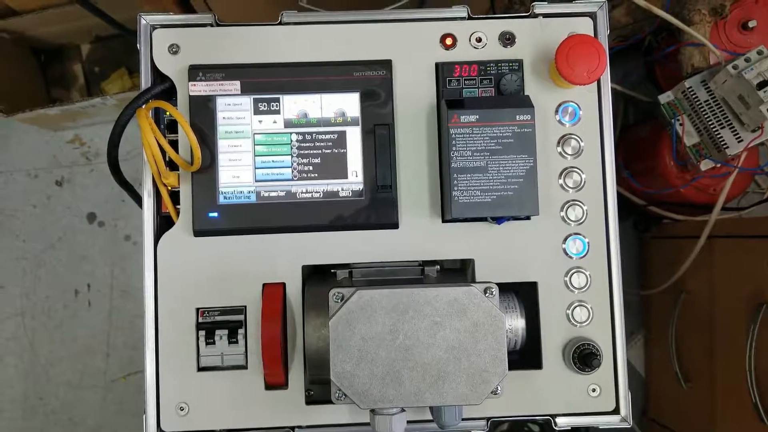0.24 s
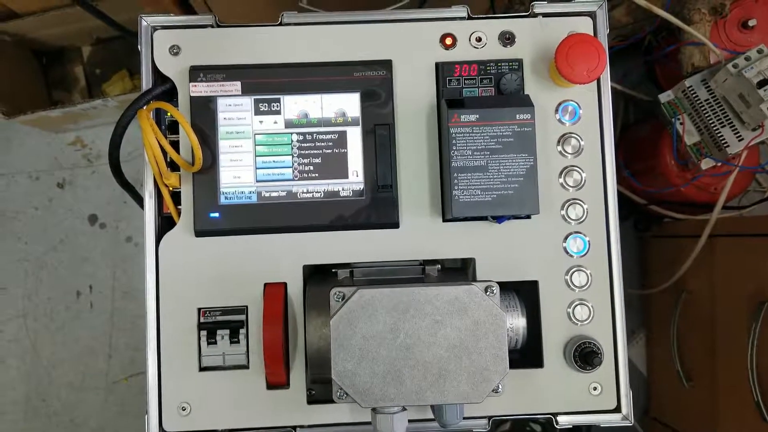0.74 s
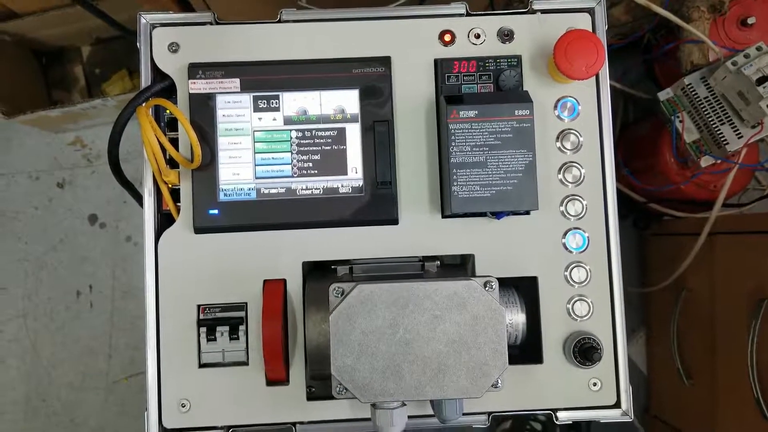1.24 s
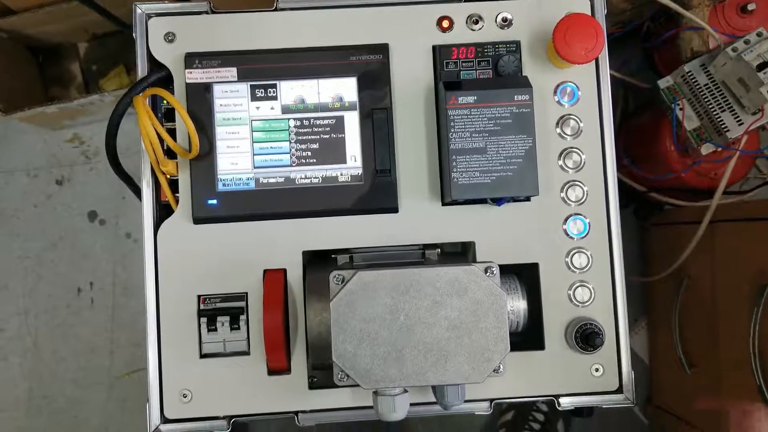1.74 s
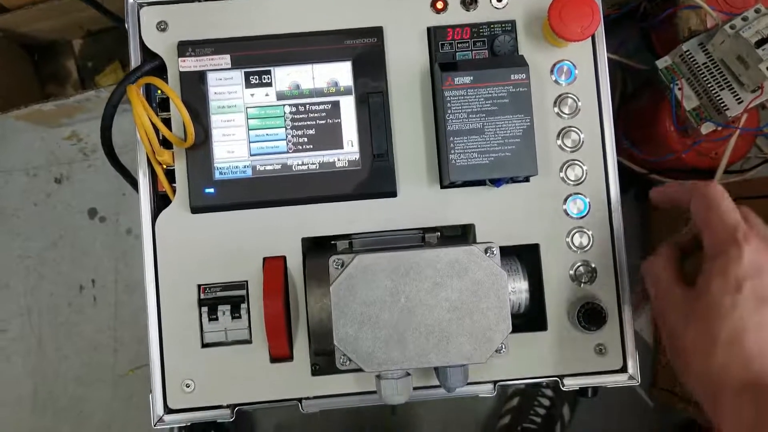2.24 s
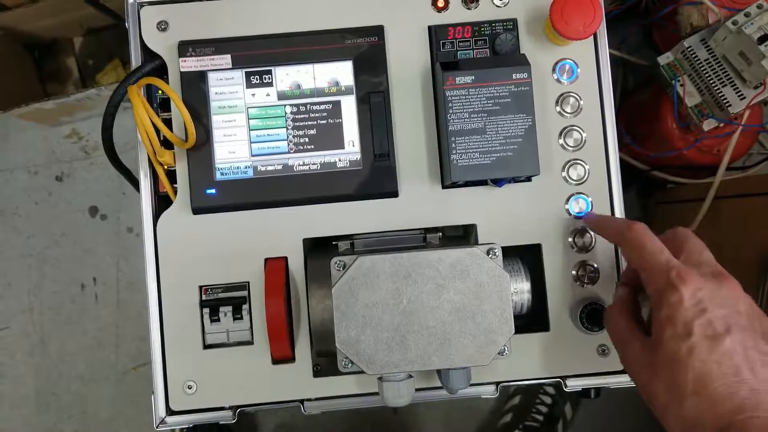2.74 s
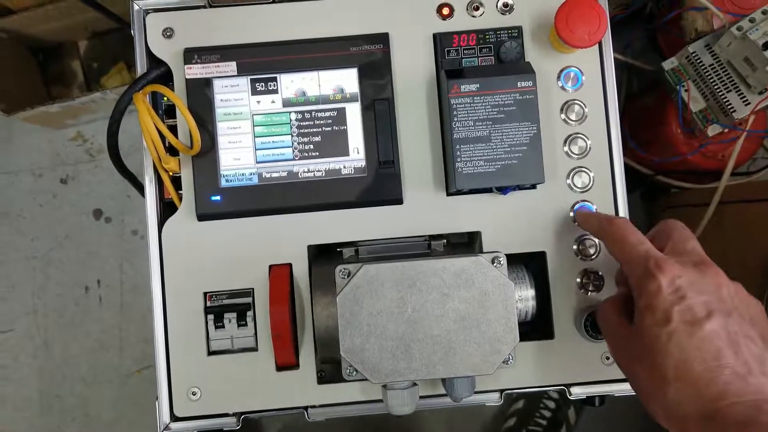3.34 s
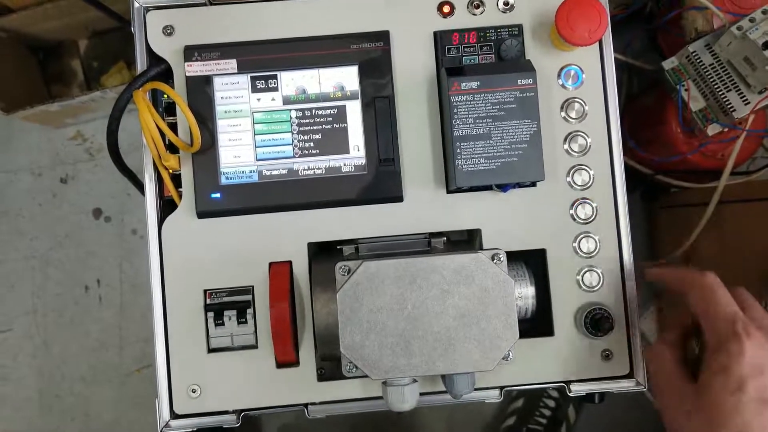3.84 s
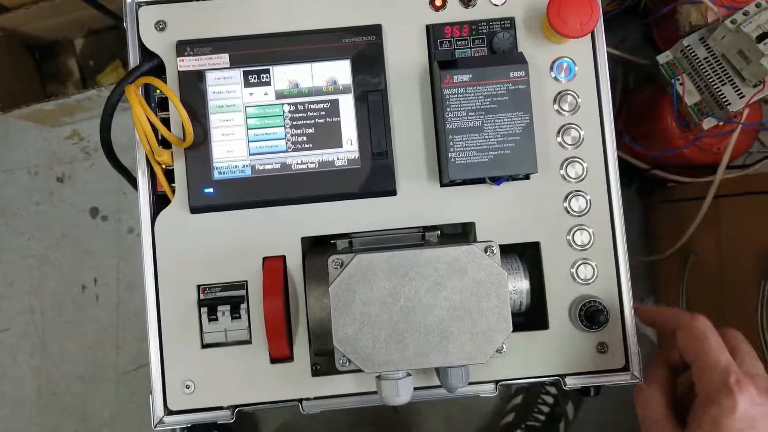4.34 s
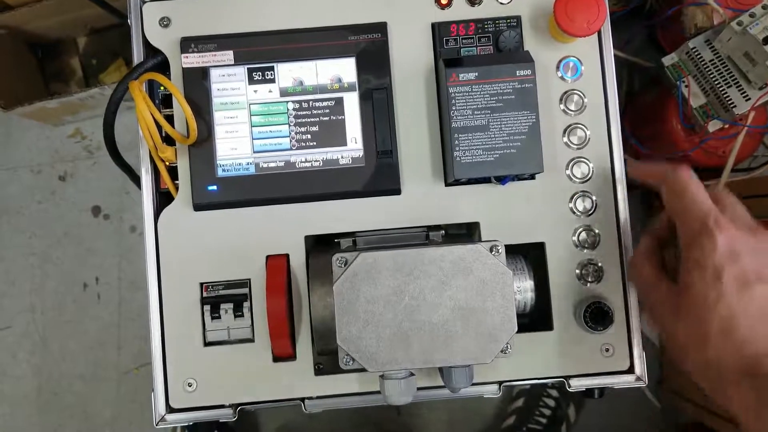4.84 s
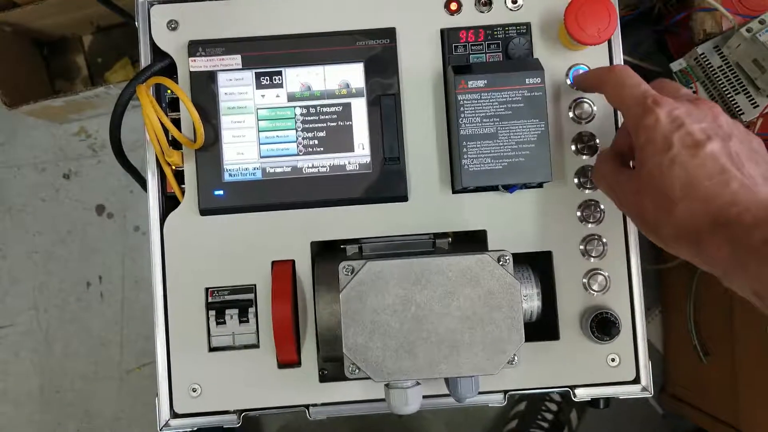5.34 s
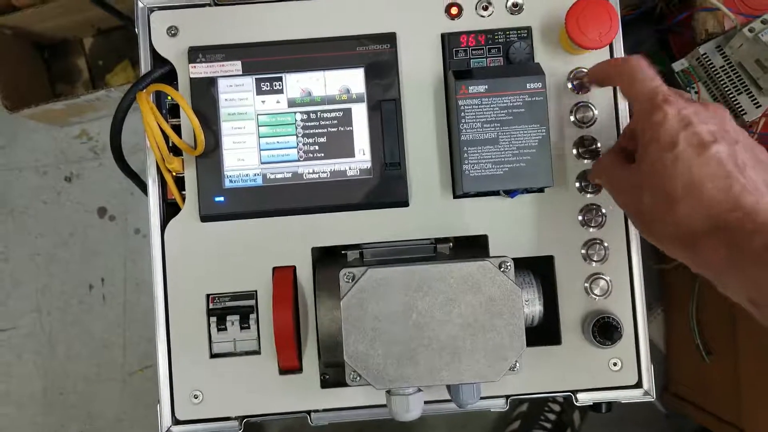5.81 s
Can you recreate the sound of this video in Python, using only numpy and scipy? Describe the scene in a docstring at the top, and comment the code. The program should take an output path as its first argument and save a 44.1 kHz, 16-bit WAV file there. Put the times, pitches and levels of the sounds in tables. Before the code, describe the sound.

A small electric motor turns slowly with rhythmic squeaks, then a button click speeds it up with a high whine until another click stops it.

```python
"""In a quiet workshop, a small induction motor in a test case crawls at 5 turns a second, squeaking once
a turn where its shaft rubs. A sleeve brushes past the hand-held phone that listens from close above.
At 3.4 s a push button clicks, the motor jerks up to 16 turns a second, and the 10 kHz whine of its
inverter (the power supply, which switches on and off very fast) swells. At 5.7 s a second click stops
the motor, and the brake current brings the whine back briefly."""
import sys
import numpy as np
from scipy import signal
from scipy.fft import rfft, irfft, next_fast_len
from scipy.io import wavfile

SR = 44100
rng = np.random.default_rng(int(sys.argv[2]) if len(sys.argv) > 2 else 0)


def unload_wav(signal):
    """Save mono or channel-first audio to the path in sys.argv[1] as 16-bit WAV at rate SR, clipped to [-1, 1]."""
    wavfile.write(
        sys.argv[1],
        SR,
        np.round(np.clip(np.atleast_2d(signal).T, -1, 1) * 32767).astype(np.int16),
    )


N = 267731
T = np.arange(N) / SR

# frequency of the current that drives the motor: t/s, f/Hz
DRIVE_FREQUENCY = [(0, 10.3), (3.44, 10.3), (3.48, 32.4), (5.72, 32.4), (5.8, .6)]


def undb(db):
    """Turn decibels into a gain."""
    return 10 ** (np.asarray(db) / 20)


def unit(x):
    """Scale a sound to an average power of 1."""
    return x / np.sqrt(np.mean(x ** 2))


def curve(rows, column=1):
    """Join one column of a time table with straight lines."""
    rows = np.array(rows, float)
    return np.interp(T, rows[:, 0], rows[:, column])


def colour(x, points, share=1):
    """Filter a sound by (f/Hz, level/dB) points; share scales the decibels."""
    hz, db = np.transpose(points)
    size = next_fast_len(x.shape[-1])
    bin_hz = np.maximum(np.fft.rfftfreq(size, 1 / SR), 1)
    gain = undb(share * np.interp(np.log(bin_hz), np.log(hz), db))
    return irfft(rfft(x, size) * gain, size)[..., :x.shape[-1]]


def wander(rate):
    """A random wobble of about 1 either way, with `rate` new values a second."""
    points = rng.standard_normal(2 ** 13)
    return 1.2 * np.interp(T * rate, np.arange(len(points)), points)


def pan(x, db):
    """Make the left side db louder than the right."""
    return x * undb(np.array([db, -db]).reshape(2, -1) / 2)


def add(out, x, start_s):
    """Mix a short sound in at a given time."""
    i = int(start_s * SR)
    out[..., i:i + x.shape[-1]] += x[..., :N - i]


def swells(rows, rise, release_s):
    """Gain of events that rise over a share of their length, hold and die away."""
    return sum(undb(db) * np.clip((T - start) / (rise * length), 0, 1)
               * np.exp(-np.maximum(T - start - length, 0) / release_s) for start, length, db in rows)


def stereo_noise(points, spread):
    """Coloured noise whose two sides are alike in the bass and less so in the treble."""
    # lean to one side: f/Hz, left minus right/dB
    balance = [(50, -2.5), (200, -6), (600, -11), (1200, -8), (2400, 0), (4200, -9.5), (6500, -8),
               (10500, 2), (15000, 0.5)]
    mid, side = rng.standard_normal((2, N))
    side = spread * colour(side, [(60, -2.0), (300, -4.5), (2000, 2.5), (6000, 1)])
    left, right = colour(mid + side, balance, 0.68), colour(mid - side, balance, -0.28)
    return unit(colour(np.array([left, right]), points))


def rubbing(turn, started, scatter_db=.5, ease_db_per_s=1.5, brighten_db_per_s=1.28):
    """Extra dB for low and high squeaks: the crawl brightens as the spot rubs dry; running eases both."""
    chance = rng.standard_normal((128, 2))[np.floor(turn + .1).astype(int) % 128].T  # new each turn
    low_db = scatter_db * chance[0] - started * ease_db_per_s * (T - 3.8)
    bright_db = (1 - started) * (brighten_db_per_s * T - 2.5) - 2 * started
    return low_db, low_db + bright_db + scatter_db * chance[1]


def rubbing_spot(turn, place, width):
    """Distance in turns from a rubbing spot, and how firmly the shaft touches it."""
    away = (turn - place + .5) % 1 - .5
    return away, np.exp(-.5 * (away / width) ** 2)


def squeaks(spots, turn, rub, waver, rasp, rasp_rate, flutter_db, scatter_db, path_ms=0.032):
    """Each rubbing spot sings as it comes round; sticking and slipping shake its pitch and strength."""
    out = np.zeros((2, N))
    low_db, high_db = rub
    drift, grip = waver * wander(45), wander(70)
    for place, width, hz, glide, db, pan_db, roughness in spots:
        away, contact = rubbing_spot(turn, place, width)
        pitch = hz * 2 ** (glide * away + drift + rasp * roughness * wander(rasp_rate))
        level_db = db + (low_db if hz < 3000 else high_db)
        level_db += flutter_db * (grip + 0.73 * wander(200)) + scatter_db * wander(11)
        phase = 2 * np.pi * np.cumsum(pitch) / SR
        # the paths to the two microphones differ a little from turn to turn
        skew = 2 * np.pi * hz * path_ms / 1000 * wander(6)
        out += pan(np.sqrt(2) * undb(level_db) * contact * np.sin([phase + skew, phase]), pan_db)
    return out


def scrape(turn, rub, place, width, db, grain_db):
    """A short, dry rasp once a turn where the shaft catches."""
    # colour of the rasp: f/Hz, level/dB
    spectrum = [(700, -15), (2100, -3), (3100, -20), (3700, -8), (4900, 5), (6100, 6.5), (7300, 6),
                (8500, -20), (10800, -0.5), (12000, 7.5), (15500, -19.5)]
    _, contact = rubbing_spot(turn, place, width)
    _, high_db = rub
    return stereo_noise(spectrum, 0.96) * contact * undb(db + high_db + grain_db * wander(700))


def crawling_shaft(turn, rub, lone_s=1.93):
    """The slow shaft squeaks and scrapes every turn; near lone_s one squeak stands out."""
    # rubbing spots: place/turns, half width/turns, f/Hz, glide/octaves per turn, level/dB,
    # left minus right/dB, roughness/0-1
    spots = [ (0.07, 0.053, 1190, -0.02, -71.5, -13.5, 0.45), (0.14, 0.052, 2395, .04, -54, 4, 0.22),
             (.31, 0.038, 2445, -0.11, -57, -7, 0.21), (0.41, 0.073, 2385, -0.097, -60, 1, .2),
             (.10, 0.066, 3620, -0.22, -72, -18, 0.39), (0.12, 0.061, 4803, 0, -58.5, -8, .2),
             (0.32, 0.1, 4870, 0.05, -64.5, -9.5, .22), (.49, 0.03, 4800, -0.12, -65.5, -9, 0.11),
             (0.16, 0.042, 7160, .05, -57.5, -3, .22), (0.5, .07, 7250, -0.13, -73, -6, 0.4),
             (.40, 0.037, 7080, 0.1, -65.5, -7.5, 0.3), (0.23, 0.17, 9600, 0, -71, 2, 0.2),
             (.06, .04, 12100, 0, -66, 2, .35), (.26, .13, 12200, 0, -66, 3, .2),
             (.16, .06, 14450, 0, -72, 0, .22), (.65, 0.038, 1490, -1.4, -65.5, -4, 0.93),
             (.82, 0.082, 1270, -.4, -65.5, -9, 1.), (0.88, 0.092, 2760, -0.59, -73, -4, 0.4)]
    # the spot that squeaks just once: same columns
    lone_spot = [(.89, 0.03, 2760, -0.45, -53.5, 0, 0.11)]
    out = squeaks(spots, turn, rub, waver=0.00602, rasp=.07, rasp_rate=540,
                  flutter_db=1.5, scatter_db=1.4)
    out += scrape(turn, rub, place=0.062, width=0.039, db=-59, grain_db=0.5)
    lone = squeaks(lone_spot, turn, rub, waver=0.0037, rasp=0.046, rasp_rate=536,
                   flutter_db=2.0, scatter_db=2.5)
    return out + lone * (abs(T - lone_s) < .1)


def bearings(turn, crawling, running, crawl_db=-64, run_db=-50):
    """The rolling bearings and the fan hiss, swelling a little once a turn."""
    # colour of the hiss at each speed: f/Hz, level/dB
    slow_spectrum = [(150, -3), (480, -2), (750, -8), (1200, -2), (1750, -15), (2500, -0.5), (3100, -23),
                     (3800, -10.5), (6500, -14.5), (8500, -37), (10800, -27), (12200, -12.5), (15800, -21)]
    fast_spectrum = [(120, -13), (250, -8.5), (350, -7.5), (520, -3), (660, -12.5), (1150, 3.5),
                     (1750, -14.5), (2700, -3), (3100, -25.5), (3800, -15), (6800, -15.5), (8600, -22.5),
                     (10500, -4), (15800, -26.5)]
    slow = stereo_noise(slow_spectrum, 0.82)
    slow *= undb(crawl_db + 0.5 * np.cos(2 * np.pi * (turn - .1)) + 2.0 * wander(30.35))
    fast = stereo_noise(fast_spectrum, 0.69)
    fast *= undb(run_db + np.cos(2 * np.pi * (turn - .35)) + 3.0 * wander(150))
    return crawling * slow + running * fast


def whine_gain(full_db=-43, full_hz=32.8, db_per_octave=10, stop_s=5.71, cut_db_per_s=802):
    """The whine grows with the drive, is cut by the stop button and returns with the brake current."""
    # pulse of brake current: t/s, length/s, level/dB
    brake_pulse = [(5.81, 0.12, -61)]
    driven_db = full_db + db_per_octave * np.log2(curve(DRIVE_FREQUENCY) / full_hz)
    cut_db = cut_db_per_s * np.maximum(T - stop_s, 0)
    return undb(driven_db - cut_db) + swells(brake_pulse, rise=0.46, release_s=0.15)


def inverter_whine(braked, switching_hz=10000.3, sway_db=1.5, sweep=.0024, ripple=0.5):
    """Fast switching makes the motor's coils sing a cluster of tones around the switching frequency."""
    # each tone's distance from the switching frequency: offset/multiples of the drive frequency
    offsets = [-19, -17, -13, -11, -7, -5, -3, -1, 1, 3, 5, 7, 11, 13, 17, 19, 23, 25, 29, 31, 35]
    # each tone's strength: level/dB
    levels = [-26, -26, -24, -23, -19, -4, -21, -4, 0, -23, -5.5, -17, -17, -15, -13, -15, -16, -19, -14,
              -21, -20]
    # the phone drifts through loud and quiet spots: t/s, left minus right/dB, phase lead of the left/rad
    phone_drift = [(0, 1, 0), (1.35, 1.5, 0.3), (1.8, 8, 1.5), (2.55, 15, 1), (2.9, 6, 2), (3.35, 8.5, .5),
                   (3.7, 6, 1.4), (4.9, 7.5, 1.5), (5.3, 8, 1.34), (6.07, 2, .4)]
    drive_cycles = np.cumsum(curve(DRIVE_FREQUENCY)) / SR
    balance_db, left_lead = curve(phone_drift), curve(phone_drift, column=2)
    tones = np.zeros((2, N))
    for offset, db in zip(offsets, levels):
        # higher tones come later, so each sixth of a drive cycle is a tiny upward chirp
        cycles = switching_hz * T + offset * drive_cycles - sweep * offset ** 2
        phase = 2 * np.pi * (cycles + 0.22 * wander(0.97))
        skew = 0.27 * wander(1.147)  # the swaying hand changes the paths to the microphones
        tones += undb(db + sway_db * wander(3.16)) * np.sin([phase + skew + left_lead, phase - skew])
    # at standstill the 100 Hz ripple of the mains supply throbs through
    throb = 1 + ripple * braked * np.cos(2 * np.pi * 100 * T)
    return unit(tones) * throb * whine_gain() * undb([np.zeros(N), -balance_db])


def hand_and_sleeve(tremble_db=-67.5):
    """A sleeve brushes past; the shifting, trembling grip rumbles in the phone's body."""
    # brushes and shifts of the grip: t/s, length/s, level/dB
    brushes = [(-.05, 0.09, -57), (.11, 0.053, -51.5), (.2, 0.18, -63), (2.44, 0.4, -56.5)]
    grip_shifts = [(0, 0.32, -59.5), (.48, 0.064, -52), (.92, 0.059, -63), (2.2, .07, -64),
                   (3.46, 0.06, -56), (3.79, 0.075, -60), (3.96, 0.14, -53.5), (4.26, 0.11, -55.5),
                   (4.68, .12, -64.5), (5.7, 0.097, -55)]
    # colours of the brushing and the rumble: f/Hz, level/dB
    brush_spectrum = [(200, -4), (1000, -4), (1600, -0.5), (2100, 3.5), (3200, -10), (4300, -9.5),
                      (6100, -6.5), (9000, -16.5), (15000, -17)]
    rumble_spectrum = [(15, -8.0), (45, 0.0), (75, -1.5), (130, -15), (300, -24), (2000, -68.5)]
    brush = stereo_noise(brush_spectrum, 0.85) * swells(brushes, rise=0.34, release_s=0.11)
    brush *= undb(1.5 * wander(60))
    grip = swells(grip_shifts, rise=0.36, release_s=.04) + undb(tremble_db + 2 * wander(8))
    return brush + stereo_noise(rumble_spectrum, 0.46) * grip


def room_noise(db=-66.5):
    """The workshop's faint, steady, low background."""
    # colour of the background: f/Hz, level/dB
    spectrum = [(20, -6.5), (50, 5.5), (110, -9.5), (270, -13.5), (420, -7.5), (800, -10), (1600, -13),
                (2600, -23), (8000, -34), (15500, -23)]
    return undb(db) * stereo_noise(spectrum, 0.7)


def room_echo(x, fade_s=0.34, echo_db=-11):
    """Add a short blur of reflections from the panel, floor and walls."""
    t = T[:SR // 3]
    tail = rng.standard_normal((2, len(t))) * undb(-60 * t / fade_s) * (t > .003)
    tail /= np.sqrt(np.sum(tail ** 2, axis=1, keepdims=True))
    return x + undb(echo_db) * signal.fftconvolve(x, tail, axes=1)[:, :N]


def button_clicks(crack_s=0.03, ring_s=0.21, ring_db=-19):
    """The spring of a metal button snaps over; the panel rings on briefly."""
    # snaps of the spring: t/s, level/dB, treble tilt/dB per octave
    snaps = [(3.1808, -49.5, -5), (3.4301, -29, -1), (3.4337, -28, -6.5), (5.7126, -27, -7),
             (5.7166, -35, -11.5)]
    # colour of a snap: f/Hz, level/dB
    spectrum = [(1200, -23.5), (2600, -11.5), (3200, -12.5), (4500, -0.5), (5400, 3.5), (6300, 0),
                (7300, 2.5), (8400, -7), (10800, 3), (13200, -2.5), (15100, 4), (16500, -20.5)]
    out, t = np.zeros((2, N)), T[:SR // 4]
    fade = undb(-60 * t / crack_s) + undb(ring_db - 60 * t / ring_s)
    for start, db, tilt_db in snaps:
        tilted = [(hz, level + tilt_db * np.log2(hz / 6000)) for hz, level in spectrum]
        noise = rng.standard_normal(len(t)) + 2.1 * rng.standard_normal((2, len(t)))
        add(out, unit(colour(noise, tilted)) * undb(db) * fade, start)
    return pan(out, -2.5)


def mount_groans():
    """The mount twists and lets go: short tones that sag as the twisting force falls."""
    # groans as the motor speeds up: t/s, length/s, first f/Hz, last f/Hz, level/dB
    groans = [(3.441, 0.031, 978, 655, -29.5), (3.449, 0.0475, 517, 337, -31),
              (3.492, .035, 1424, 1200, -45), (3.496, 0.041, 406, 323, -32.5),
              (3.501, 0.043, 888, 730, -44), (3.508, 0.073, 208.4, 195, -37.5)]
    out = np.zeros(N)
    for start, length, first_hz, last_hz, db in groans:
        progress = np.linspace(0, 1, int(length * SR))
        pitch = first_hz + (last_hz - first_hz) * progress
        swell = undb(db) * np.sin(np.pi * np.sqrt(progress)) ** 2
        add(out, swell * np.sin(2 * np.pi * np.cumsum(pitch) / SR), start)
    return pan(out, -6.5)


def motor_jolts(first_gap_ms=2.15, gap_growth=1.3, contact_growth=1.06, lowest_hz=215):
    """The motor kicks its mount and bounces ever slower and softer, making the case ring."""
    # kicks on starting and stopping: t/s, level/dB, contact/ms (longer is duller), bouncing/ms
    kicks = [(3.4428, -33.5, 0.42, 14.6), (3.498, -44, 2.6, 2), (3.5001, -26.5, 2, 3.3),
             (3.512, -34.5, 1.3, 2), (3.5184, -36, 1.34, 2), (5.732, -40.5, 2.2, 2), (5.758, -49.5, 2, 2),
             (5.81, -45.5, 2.2, 2)]
    # ringing tones of the case: f/Hz, level/dB, time to fade by 60 dB/s
    case_tones = [(201.7, -9, 0.36), (338.4, -6, 0.13), (384, -7, 0.11), (465, -6, 0.2),
                  (525.5, -6.5, 0.18), (568, -4, 0.052), (770, -18, 0.15), (890, -24, 0.032),
                  (1132, 0, 0.06), (1172, 0.5, 0.089), (1410, -22, 0.033)]
    pushes, t = np.zeros(N), T[:SR // 2]
    for start, db, contact_ms, bouncing_ms in kicks:
        late_ms = 0
        for bounce in range(7):
            progress = np.minimum(t * 1000 / (contact_ms * contact_growth ** bounce), 1)
            push = np.sin(np.pi * progress) ** 2
            fade = max(1 - (late_ms / bouncing_ms) ** 2, 0)
            add(pushes, fade * undb(db) * push / push.sum(), start + late_ms / 1000)
            late_ms += first_gap_ms * gap_growth ** bounce
    ring = sum(undb(db - 60 * t / fade_s) * np.sin(2 * np.pi * hz * t) for hz, db, fade_s in case_tones)
    # the small case gives off no deep bass
    ring = signal.sosfilt(signal.butter(4, lowest_hz, "high", fs=SR, output="sos"), ring)
    return pan(signal.fftconvolve(pushes, ring)[:N], -6.5)


def running_shaft(turn, rub):
    """The fast shaft squeaks louder and scrapes more grittily."""
    # rubbing spots: same columns as in crawling_shaft
    spots = [ (0.383, 0.11, 1200, -.1, -48.5, -0.5, .7), (0.2, 0.41, 1190, -0.0023, -58.5, 3, 1.),
             (.14, 0.1, 2740, -.3, -52, 1, 0.402), (.39, 0.081, 2490, -.3, -47.5, 1, 0.3737),
             (0.49, 0.084, 2440, 0.0011, -51.5, -8, .3), (.36, 0.16, 3750, -.2, -61, -7, 0.687),
             (.42, 0.068, 4930, -.1, -52.5, -6.5, 0.303), (.52, 0.064, 4850, -.08, -47, -11, 0.203),
             (0.28, 0.16, 6580, 0, -53, 4.5, 0.248), (.39, 0.087, 7370, -0.16, -57.5, -5, 0.22),
             (0.99, 0.11, 5530, 0, -58, 0, 0.36), (0.7, 0.2, 7200, 0, -62, -8, 0.148),
             (0.44, 0.073, 12240, 0, -52, 3, 0.167)]
    out = squeaks(spots, turn, rub, waver=.008, rasp=.065, rasp_rate=600,
                  flutter_db=2.14, scatter_db=0.9)
    return out + scrape(turn, rub, place=0.56, width=0.031, db=-53, grain_db=6.0)


def frame_hum(running, braked):
    """The frame drones at its own tones; the lowest leads once the brake current holds the motor."""
    # tones of the frame: f/Hz, running level/dB, braked level/dB
    frame_tones = [(207.3, -76, -71.5), (354.3, -63.5, -82), (465, -69, -85), (533.6, -74, -83)]
    out = 0
    for hz, run_db, brake_db in frame_tones:
        pitch = hz * (1 + 0.01554 * wander(40))
        tone = np.sqrt(2) * np.sin(2 * np.pi * np.cumsum(pitch) / SR) * undb(2.17 * wander(25))
        out += tone * (running * undb(run_db) + braked * undb(brake_db))
    return pan(out, -8.0)


def scene():
    """Mix everything; the shaft's speed sets the rhythm of the squeaks and which of them sound."""
    # how fast the shaft spins: t/s, speed/turns per second
    shaft_speed = [(0, 5), (3.44, 5), (3.48, 16), (4.6, 16), (4.9, 16.13), (5.4, 16.12), (5.62, 16.3),
                   (5.74, 16.3), (5.82, 0)]
    speed = curve(shaft_speed)
    turn = .25 + np.cumsum(speed) / SR + 0.00789 * wander(9)
    running = np.clip((speed - 5) / 11, 0, 1)
    started = np.maximum.accumulate(running)  # stays at 1 once the motor has sped up
    crawling, braked = 1 - started, started - running
    rub = rubbing(turn, started)
    shaft = crawling * crawling_shaft(turn, rub) + running * running_shaft(turn, rub)
    echoing = room_echo(shaft + bearings(turn, crawling, running) + button_clicks())
    return (echoing + inverter_whine(braked) + motor_jolts() + mount_groans()
            + frame_hum(running, braked) + hand_and_sleeve() + room_noise())


def record(dry):
    """The left microphone is a little further from the motor; the phone cuts the highest treble."""
    lag_samples, top_hz = 2, 16300
    left = np.pad(dry[0], (lag_samples, 0))[:N]
    treble_cut = signal.ellip(10, .2, 80, top_hz, fs=SR, output="sos")
    return signal.sosfilt(treble_cut, np.array([left, dry[1]]))


dry = scene()
out = record(dry)
unload_wav(out)
```